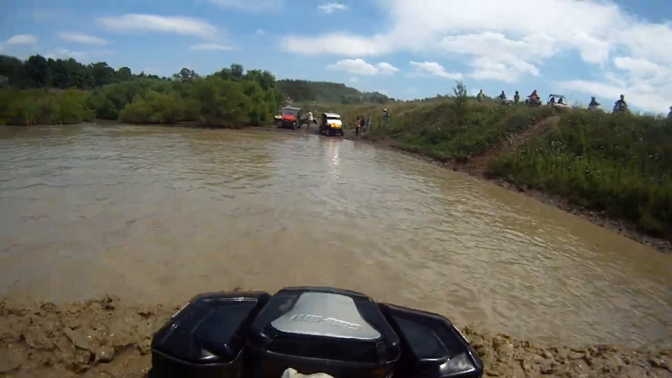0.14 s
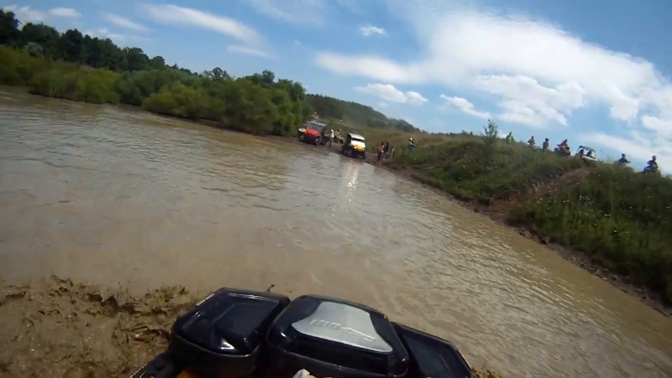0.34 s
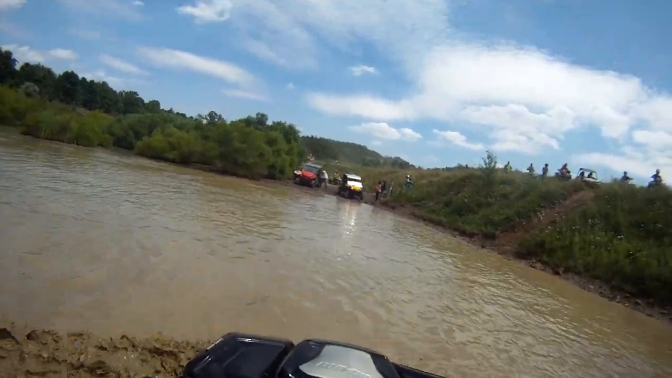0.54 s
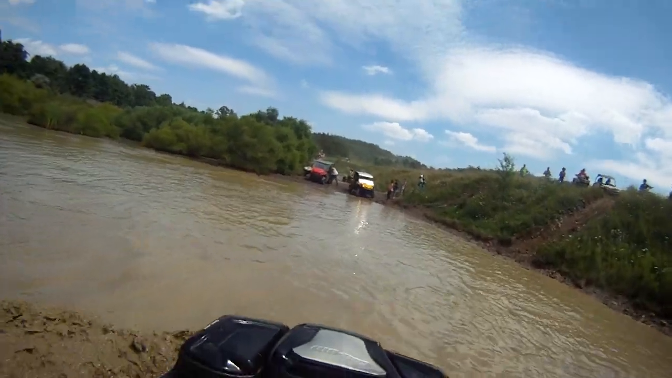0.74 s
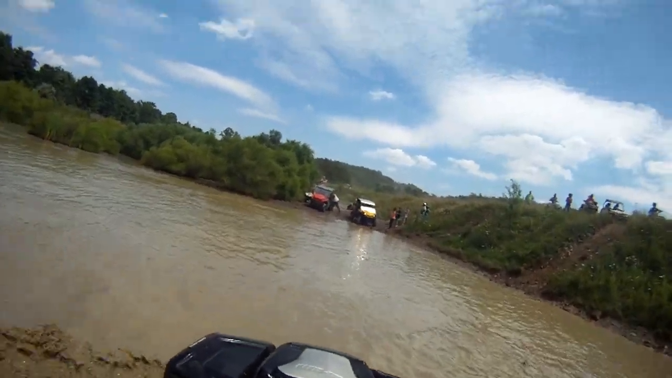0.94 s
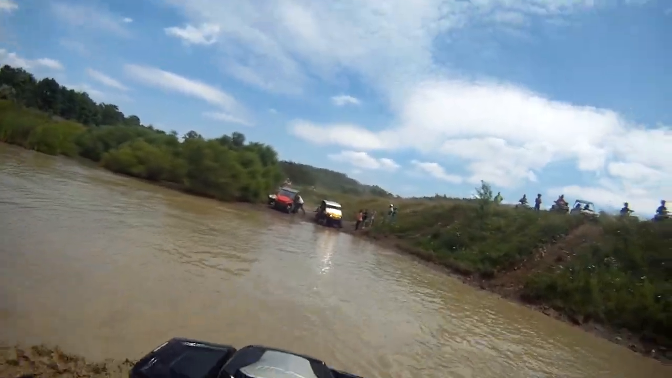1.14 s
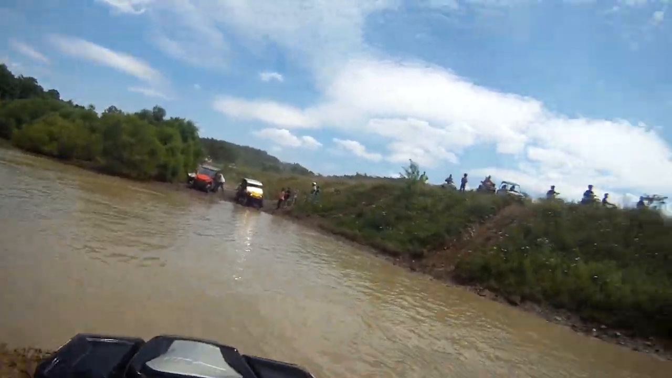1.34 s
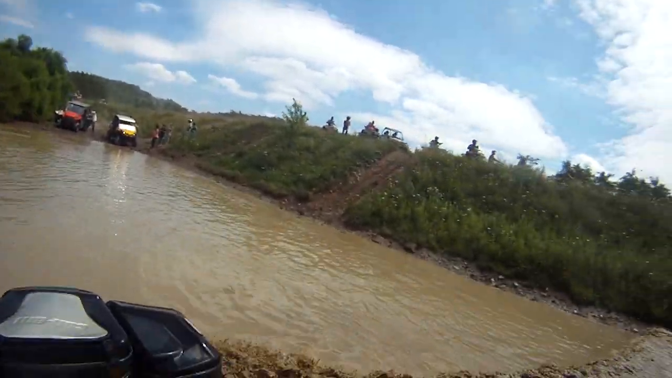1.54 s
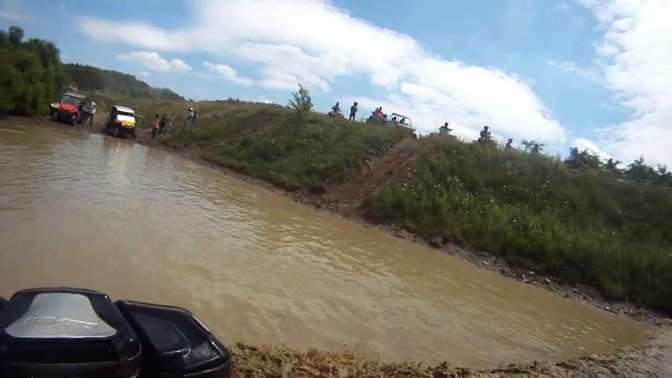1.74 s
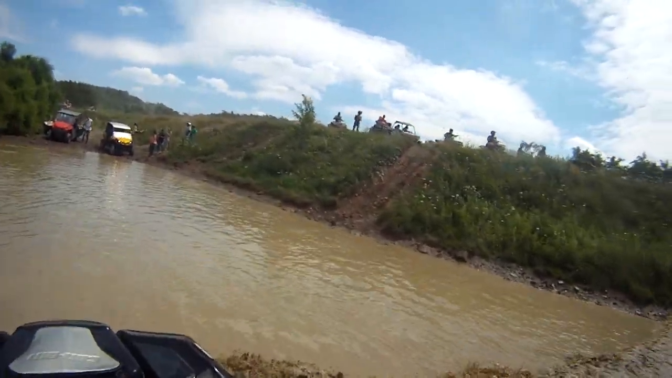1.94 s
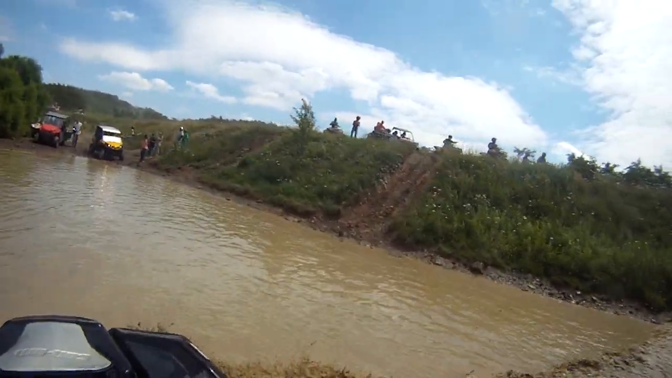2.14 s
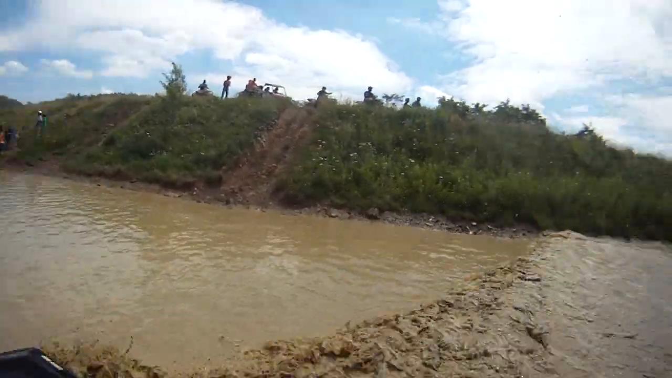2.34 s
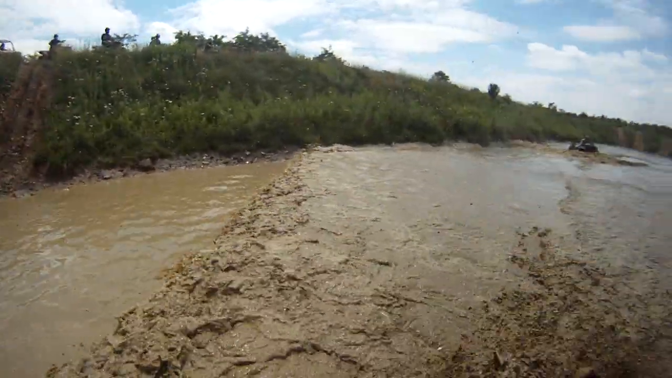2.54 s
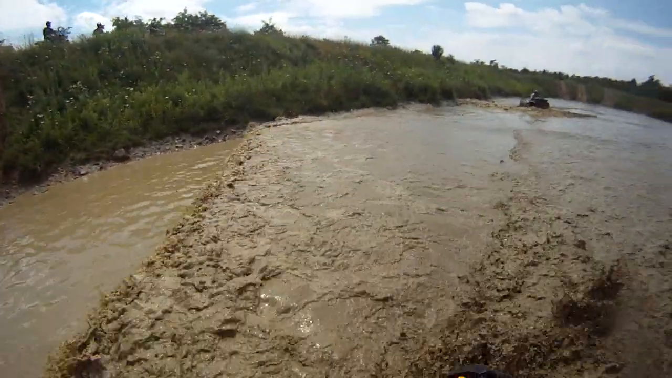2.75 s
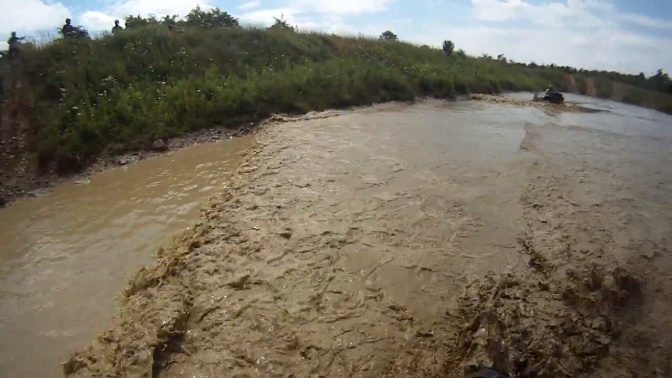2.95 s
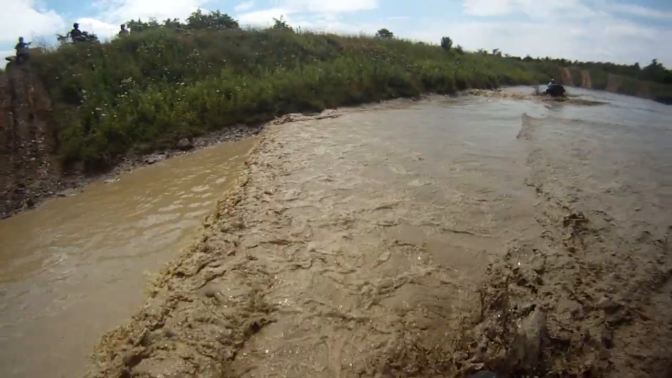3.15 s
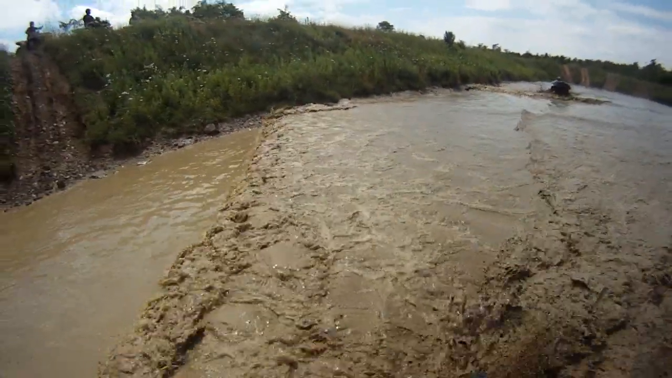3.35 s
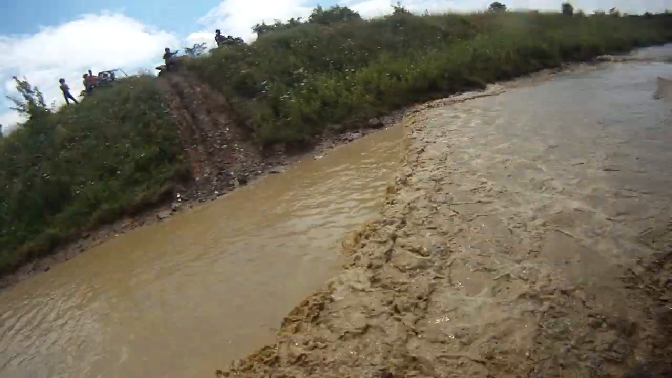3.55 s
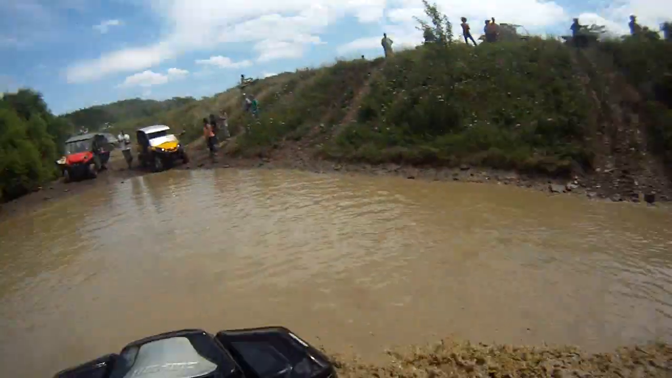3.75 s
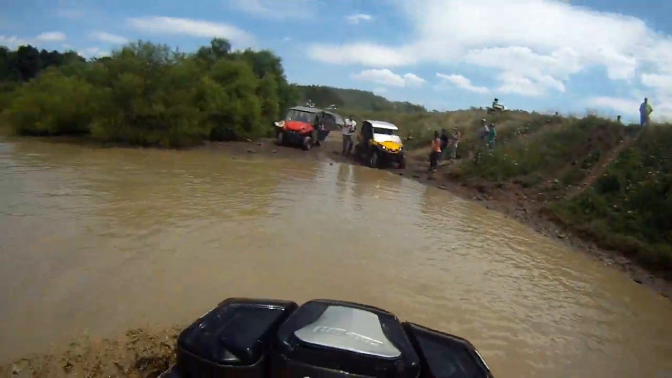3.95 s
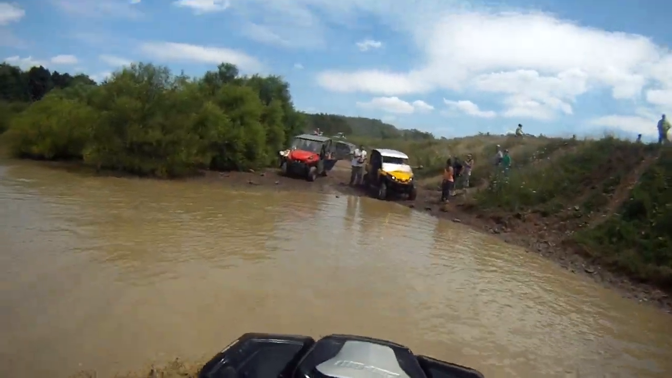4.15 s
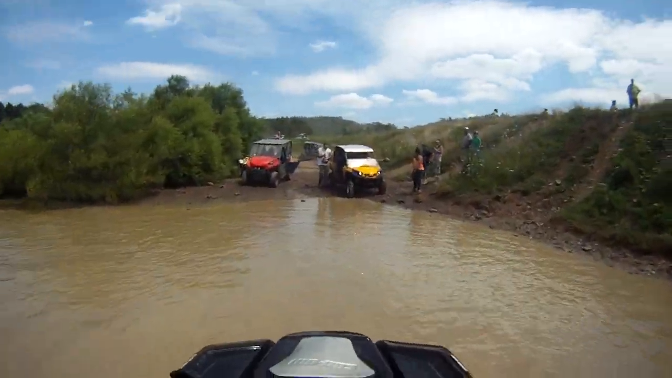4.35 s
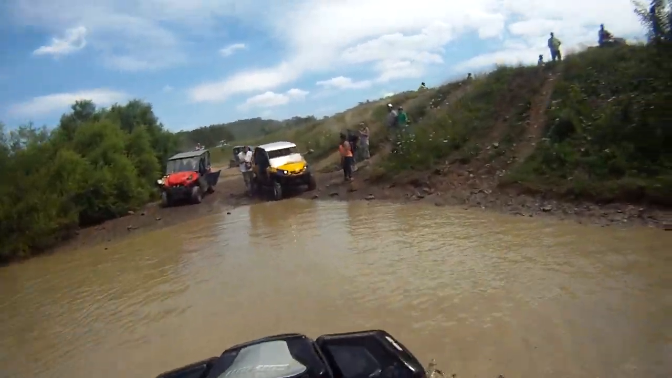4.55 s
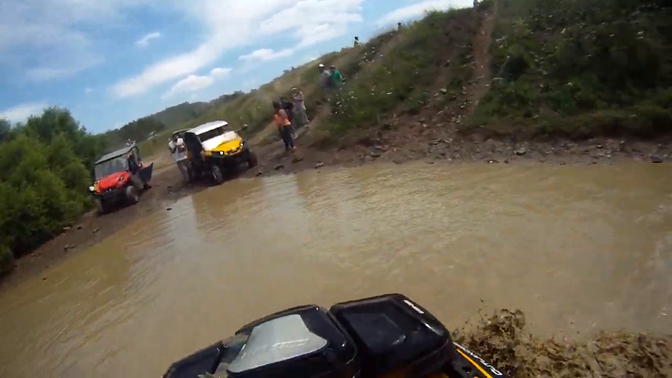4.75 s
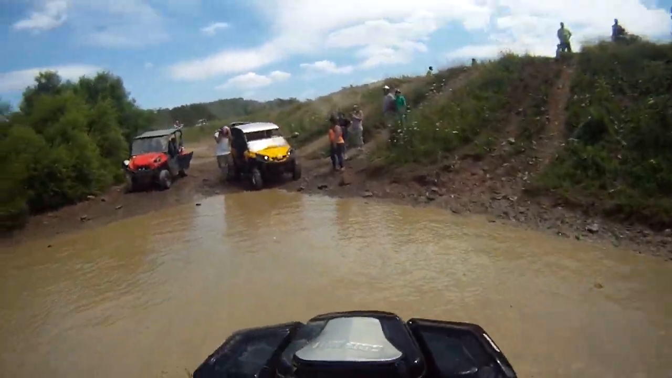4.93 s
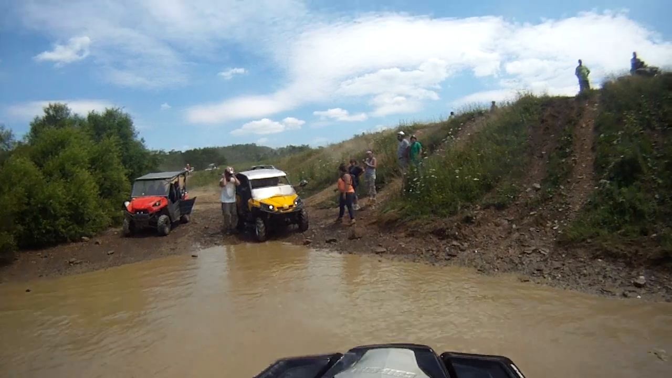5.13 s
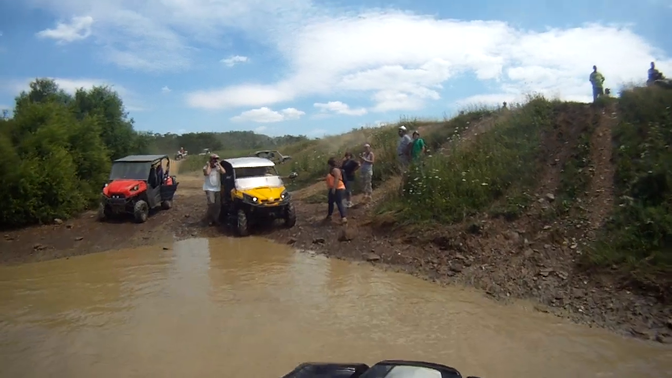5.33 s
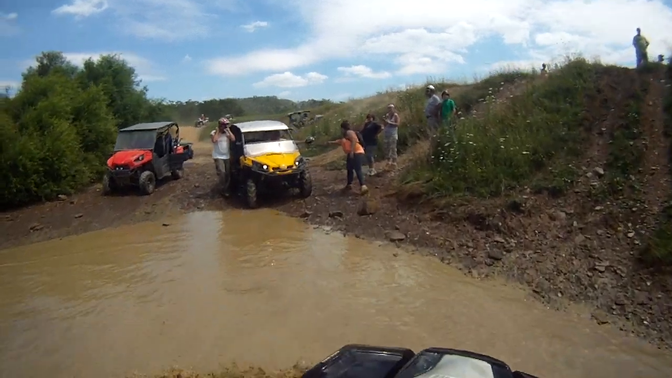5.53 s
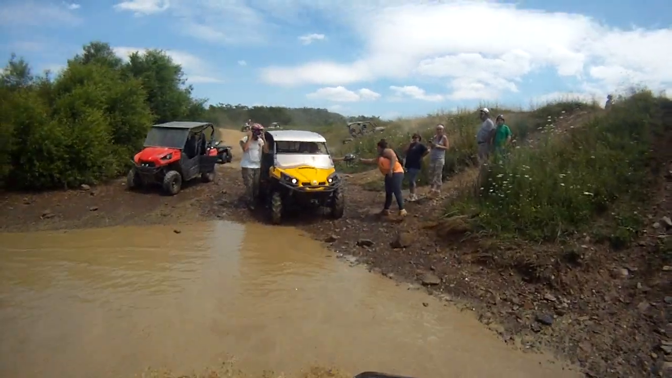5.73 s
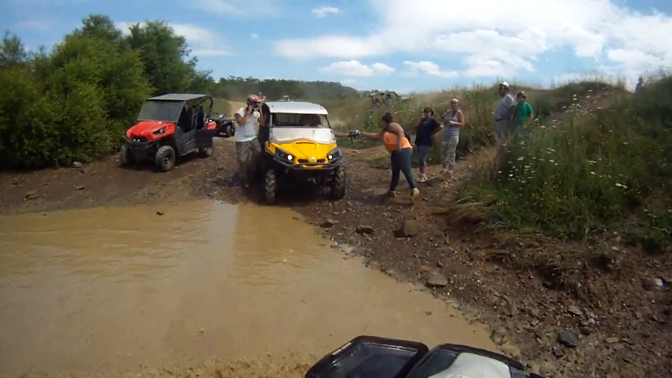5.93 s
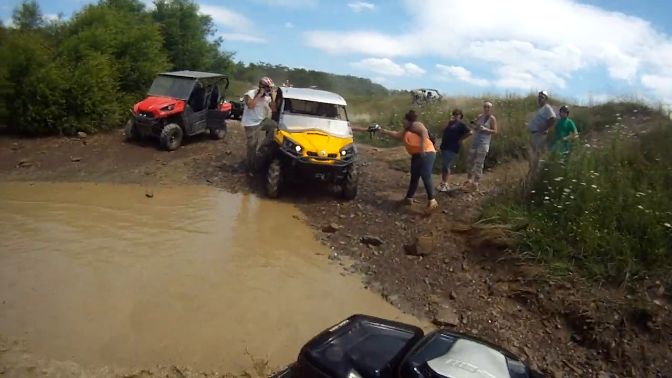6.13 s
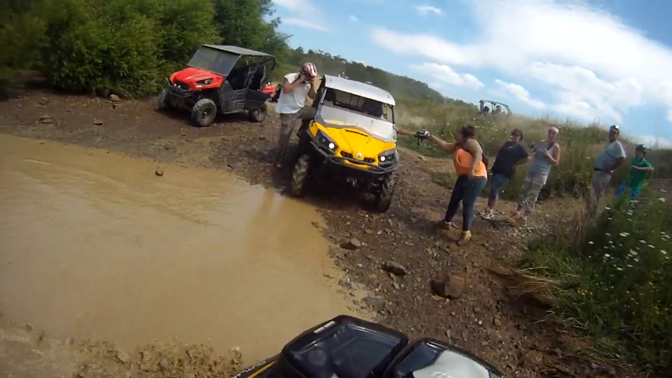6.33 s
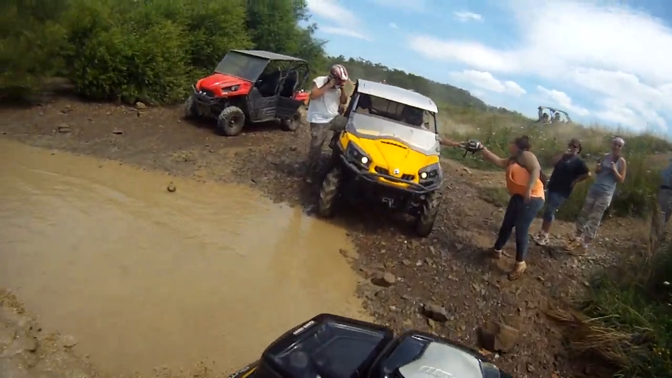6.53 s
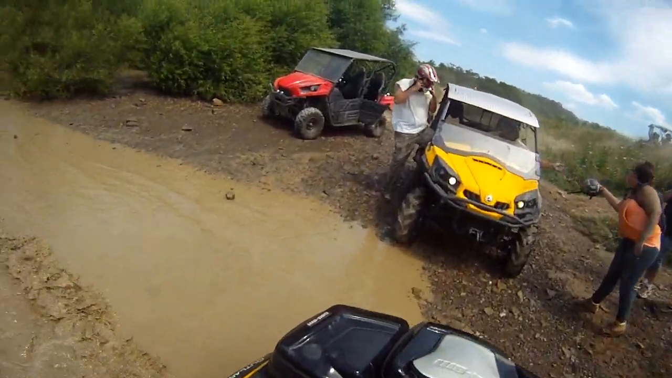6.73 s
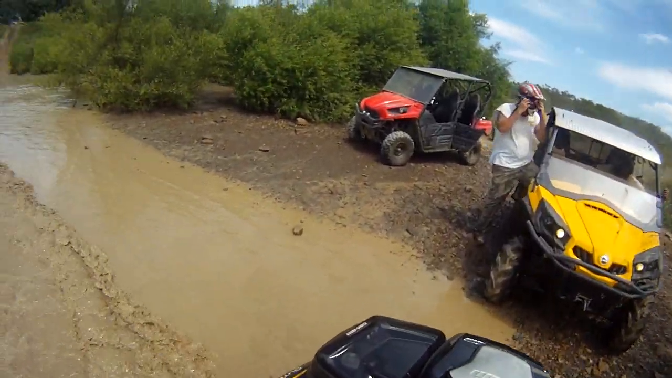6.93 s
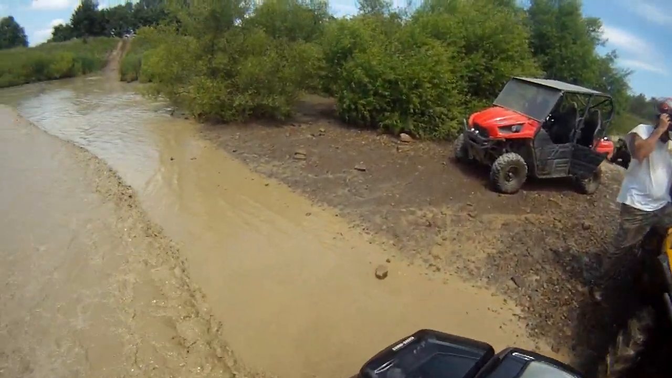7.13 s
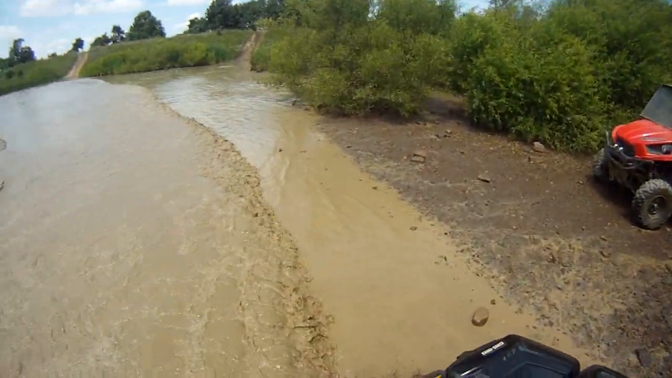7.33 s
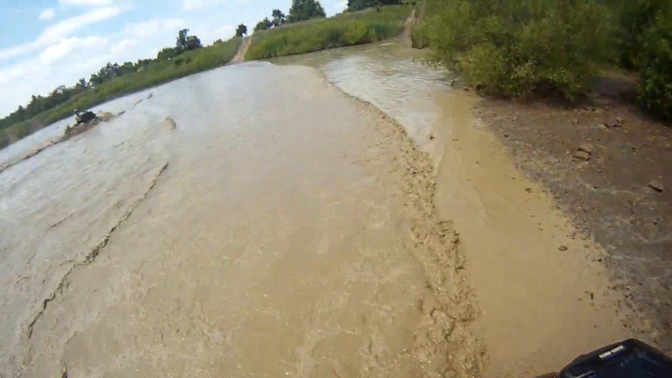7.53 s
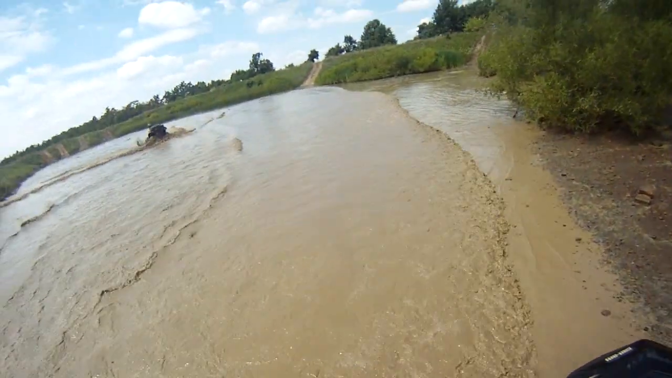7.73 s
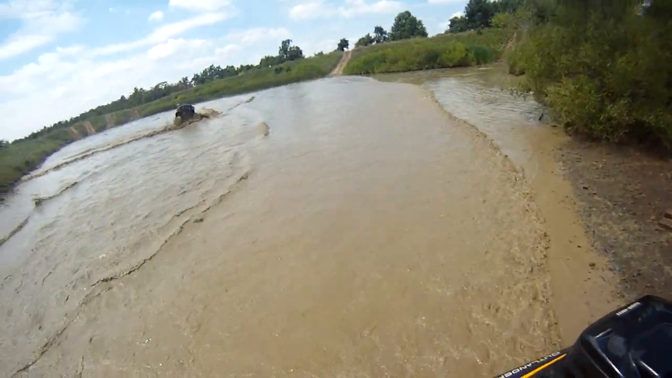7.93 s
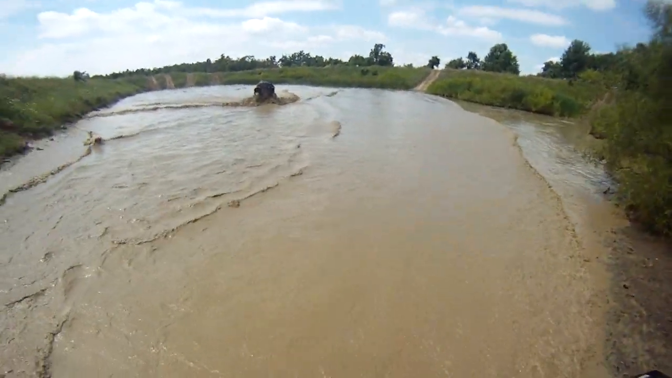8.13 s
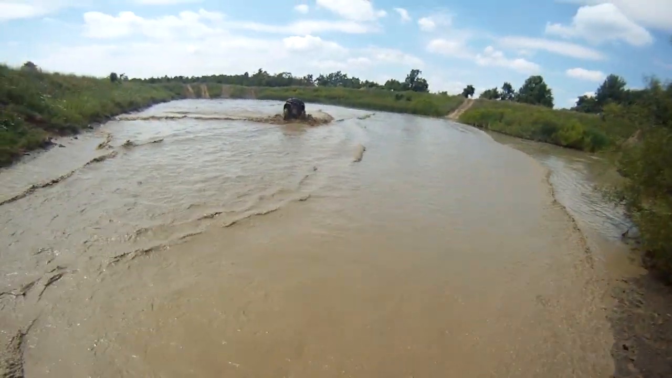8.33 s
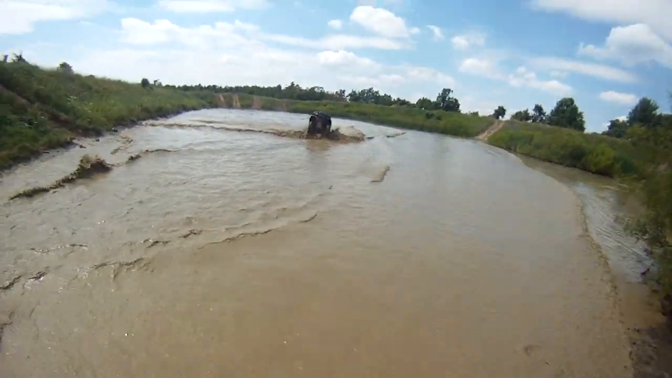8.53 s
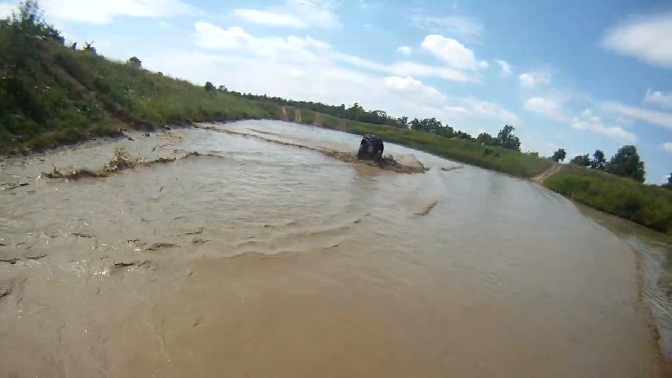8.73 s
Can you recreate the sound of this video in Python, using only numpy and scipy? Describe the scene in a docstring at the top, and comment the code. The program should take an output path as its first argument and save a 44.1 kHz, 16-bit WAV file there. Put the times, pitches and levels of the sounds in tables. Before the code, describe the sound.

Heard from a helmet microphone in the open, a quad wades through a muddy pond with a loud, slightly wavering engine drone, rattling covers and whirring belt drive. Water sloshes and sprays more strongly midway, with a short surge. The throttle then eases, the engine quietens and slows to lumpy thuds, then revives a little. A faint distant quad hums near the end under light wind; the sound has a thin glassy fizz.

```python
"""A muddy pond: a V-twin quad wades under throttle, eases off near the bank, chugs almost at idle and pulls away.
Close by, engine-order harmonics boom, noise growls in the air box, and taps and cogs clatter in their covers.
Around them bubbles and filtered noise make the churned water and mud; another quad drones far out on the pond.
The microphone is on the rider's helmet in light wind; its camera holds coarse samples, a thin glassy fizz."""
import sys
import numpy as np
from scipy.fft import rfft, irfft, next_fast_len
from scipy.io import wavfile
from scipy.ndimage import uniform_filter1d, map_coordinates

SR = 44100
rng = np.random.default_rng(int(sys.argv[2]) if len(sys.argv) > 2 else 0)


def wrap_up_sound(samples):
    """Save the sound to the file named by the first command line argument, as 16-bit audio."""
    columns = np.atleast_2d(samples).T
    # keep every value between -1 and 1, then stretch to whole-number steps
    tamed = np.clip(columns, -1, 1)
    steps = np.round(tamed * 32767).astype(np.int16)
    wavfile.write(sys.argv[1], SR, steps)


N = 387189  # length in samples

# Engine speed, before a slight wander: t/s, rate/four-stroke cycles per second
ENGINE_SPEED = [(0.0, 45.9), (0.26, 45.2), (0.54, 47.0), (0.75, 45.6), (0.89, 47.1), (1.06, 43.4),
                (1.31, 45.8), (1.82, 47.9), (1.95, 49.7), (2.19, 45.5), (2.51, 45.4), (2.71, 46.9),
                (3.49, 47.1), (3.65, 50.0), (3.95, 44.5), (4.34, 47.4), (4.82, 44.2), (5.01, 45.0),
                (5.23, 41.2), (5.36, 37.8), (5.52, 30.3), (5.65, 28.4), (6.2, 27.9), (6.48, 29.3),
                (7.16, 24.9), (7.33, 21.0), (7.58, 17.2), (7.86, 23.7), (8.14, 24.6), (8.36, 27.5),
                (8.56, 27.6), (8.78, 20.8)]
# How hard the engine works: t/s, exhaust gain/dB
THROTTLE_GAIN = [(0, -31.5), (1.1, -31.5), (1.85, -30.5), (2.3, -32), (2.6, -31), (3.45, -30.7), (3.9, -33),
                 (4.3, -31), (4.75, -35), (5.15, -32.5), (5.5, -41), (6.4, -41.5), (7.1, -44.5),
                 (7.55, -48.5), (8, -37.3), (8.3, -40), (8.6, -42), (8.78, -49)]
# Riding and where the helmet points: t/s, load/0-1, head turned back towards the tailpipe/0-1
RIDE_AND_HEAD = [(0, 1, 0), (2.35, 1, 0), (2.6, 1, 1), (3.65, 1, 1), (3.85, 1, 0), (5.25, 1, 0),
                 (5.5, 0, 0), (7.15, 0, 0), (7.5, 0, 1), (8.78, 0, 1)]
# Blend from the coasting tone to the pulling-away tone as the engine sinks to near idle: t/s, share/0-1
PULLING_SHARE = [(7.2, 0.02), (7.6, 0.74)]
# What the exhaust passes of each engine order with the throttle open: f/Hz, gain/dB
OPEN_THROTTLE_TONE = [(38, -8), (47, -4.5), (84, -5), (95, -2.5), (121, -1), (140, -5.5), (165, -12),
                      (188, -13.5), (232, -20), (290, -21.5), (330, -28.5), (365, -15), (435, -14.5),
                      (475, -26), (600, -21), (740, -35), (890, -29), (1000, -41)]
# Extra growl when the microphone faces the tailpipe: f/Hz, gain/dB
TAILPIPE_TONE = [(90, 1), (140, 1), (230, -1), (300, 3.5), (430, 3), (600, -2.5), (900, 11.5)]
# The exhaust with the throttle nearly shut: f/Hz, gain/dB
COASTING_TONE = [(28, -14), (56, -8.5), (84, -3.5), (112, -4), (126, 2), (142, -2.5), (170, -26),
                 (198, -30), (226, -9.5), (265, -28), (312, -15.5), (360, -16.5), (430, -24), (600, -39)]
# The exhaust near idle and while pulling away: f/Hz, gain/dB
PULLING_TONE = [(25, -24), (50, -21), (75, -10), (97, -9), (108, -3), (122, 2), (138, -4), (165, -20),
                (200, -11.5), (222, -17), (260, -5.5), (320, -11), (400, -25), (560, -32)]
# One order of the note swells or dips for a moment: t/s, half length/s, order, lift/dB
ORDER_SWELLS = [(.25, 0.22, 3, 2.5), (.58, .1, 4, 7), (1.557, 0.38, 5, 9), (2.9, 0.33, 10, 7),
                (3.62, 0.14, 6, 14), (6.35, .25, 12, 5.5), (6.9, 0.22, 3, 5), (7.7, 0.1, 6, 13),
                (7.8, 0.11, 5, 4.5), (8.62, .06, 3, 13), (8.66, .12, 5, -9)]
FIRING_GAP = 0.415  # between the two cylinders, in cycles
WAVER_DB = 2.5  # how far the higher orders drift in level, scaled down for those below 250 Hz
DULL_BELOW_RATE, DULL_DB_PER_RATE, DULL_ABOVE_ORDER = 28.4, 1.0, 6.5  # cycles/s, dB per cycle/s, order


def exhaust(turns):
    """The main note: harmonics of the cycle from two unevenly firing cylinders slide through the pipe's resonances."""
    speed, = curves(ENGINE_SPEED)
    effort_db, = curves(THROTTLE_GAIN)
    pulling, = curves(PULLING_SHARE)
    loaded, back = curves(RIDE_AND_HEAD)
    tones = [(OPEN_THROTTLE_TONE, loaded), (TAILPIPE_TONE, loaded * back),
             (COASTING_TONE, (1 - loaded) * (1 - pulling)), (PULLING_TONE, pulling)]
    knots = np.arange(0, turns[-1], 7)  # the drift changes every 7 cycles

    def partial(k):
        """Order k: the two cylinders add or cancel, and the pipe sets its level."""
        # the second cylinder is the duller one
        cylinders = 1 + np.exp(-k / 9 - 2j * np.pi * k * FIRING_GAP)
        # phases grow looser with order, so the upper growl does not chirp
        smear = 1 - 0.715 * k + rng.normal(0, 0.12 * k)
        db = sum(share * along(tone, k * speed) for tone, share in tones)
        # near idle the upper orders fade
        if k > DULL_ABOVE_ORDER:
            db = db - DULL_DB_PER_RATE * np.maximum(DULL_BELOW_RATE - speed, 0)
        for s, half_s, order, lift_db in ORDER_SWELLS:
            if round(order) == k:
                db = db + lift_db * swell(s, half_s)
        wave = np.cos(2 * np.pi * k * turns + np.angle(cylinders) + smear)
        return amp(db) * np.sqrt(2) * np.abs(cylinders) * wave

    def drift(k):
        """Each higher order drifts in level at random."""
        wander = np.interp(turns, knots, rng.standard_normal(len(knots)))
        return wander * np.minimum(k * speed / 250, 1) ** 2

    boom = sum(partial(k) for k in range(1, 4))
    growl = sum(amp(WAVER_DB * drift(k)) * partial(k) for k in range(4, 21))
    return amp(effort_db) * (boom * amp(0.19 * wobble(28)) + growl * amp(0.73 * wobble(40)))


# Exhaust pipe and silencer, as thuds pass through them: f/Hz, gain/dB
PIPE_TONE = [(15, -48), (30, 0), (48, 2.5), (70, -1.5), (93, 4.5), (120, 4), (142, -1.5), (170, -11.5),
             (230, -15), (300, -38.5), (700, -60), (2000, -110)]
# Hard firings near idle: t/s, nominal level/dB
HARD_FIRINGS = [(7.237, -33), (7.399, -32), (7.47, -30), (7.581, -26), (7.647, -27), (7.697, -28),
                (7.746, -23), (8.609, -36), (8.656, -29)]
# at cruise/dB, per doubling of speed/dB, per dB of throttle/dB
FLUTTER_DB, FLUTTER_DB_PER_OCTAVE, FLUTTER_FOLLOWS = -41.5, 4, 0.3


def flutter(turns):
    """No two firings are alike: what each has above or below the regular firing thuds in the pipe."""
    flutter_db = driven(FLUTTER_DB, FLUTTER_DB_PER_OCTAVE, FLUTTER_FOLLOWS)
    varied = twin(turns, gap=FIRING_GAP, second_db=-1, jitter_s=0.0003, scatter_db=2)
    regular = twin(turns, gap=FIRING_GAP, second_db=-1, jitter_s=0, scatter_db=0)
    kicks = np.zeros(N)
    for s, db in HARD_FIRINGS:
        # 4 ms early, and raised because the pipe spreads out a one-sample kick
        kicks[round((s - 0.004) * SR)] = -amp(db + 41.5)
    return amp(flutter_db) * even(body(varied - regular, PIPE_TONE)) + body(kicks, PIPE_TONE)


# Air box resonances: f/Hz, width/Hz, gain/dB
AIRBOX_MODES = [(237.4, 22, 2), (311, 25, -5), (402, 117, -6.5), (612, 110, -4.5), (900, 60, -11)]
# at cruise/dB, per doubling of speed/dB, per dB of throttle/dB
INTAKE_DB, INTAKE_DB_PER_OCTAVE, INTAKE_FOLLOWS = -46, 3.5, 0.5


def intake(turns):
    """Turbulent gulps of air, one per cycle, rasp in the resonances of the air box."""
    intake_db = driven(INTAKE_DB, INTAKE_DB_PER_OCTAVE, INTAKE_FOLLOWS)
    gulps = noise() * amp(1.9 * np.cos(2 * np.pi * (turns - 0.2)))
    tone = [(60, -28.5), (150, 11.0), (220, 0), (900, -5), (1500, -12), (5000, -38)]
    rasp = body(resonate(gulps, AIRBOX_MODES), tone)
    return amp(intake_db) * even(rasp)


# Valve and cover clatter, before a small wobble: t/s, level/dB
CLATTER_LEVEL = [(0, -35.5), (.6, -32.5), (2.2, -33.5), (3, -33.5), (5.15, -33.5), (5.45, -39.5),
                 (6.9, -44), (7.7, -45.5), (7.95, -42.5), (8.5, -41.5), (8.78, -45.5)]
# Ring of the cylinder heads and covers: f/Hz, gain/dB
HEAD_TONE = [(300, -38.5), (780, -18), (950, -14), (1100, -0.5), (1270, 2.5), (1400, -9), (1800, -13.5),
             (3000, -29), (6000, -55)]


def valves(turns):
    """Valves and cam chain tap in step with the shaft and loose parts rattle; the ring sounds lower from behind."""
    loaded, back = curves(RIDE_AND_HEAD)
    valve_db = curves(CLATTER_LEVEL)[0] + 0.65 * wobble(22)
    taps = twin(turns + 0.0997, gap=0.36, second_db=-5, jitter_s=0.00008, scatter_db=2.0)
    throb_db = 0.59 * np.cos(2 * np.pi * (turns - 0.25)) + 0.47 * np.cos(4 * np.pi * turns)
    chain = amp(-13.5 + 2.4 * loaded) * meshing(turns, count=90)
    rattle = unit((noise() + chain) * amp(throb_db + 0.68 * wobble(45)))
    ring = body(rattle + amp(-7.0) * unit(taps), HEAD_TONE)
    behind = body(ring, [(850, 5.5), (1120, 4), (1300, -3.0), (1600, 1)])
    return amp(valve_db) * even((1 - back) * ring + back * behind)


# Ring of the belt drive casing: f/Hz, gain/dB
CASING_TONE = [(500, -39), (1250, -15.5), (1420, -13.5), (1530, -2.5), (1760, -8.5), (2060, 1),
               (2180, -1.5), (2320, 1.5), (2500, -4), (2680, -15.5), (3080, -22), (3450, -15.5),
               (3850, -20), (5000, -38.5)]
# at cruise/dB, per doubling of speed/dB, per dB of throttle/dB
BELT_DB, BELT_DB_PER_OCTAVE, BELT_FOLLOWS = -35.5, 2, 0.28


def belt_drive(turns):
    """Belt cogs and gears rasp in their casing, throbbing with the power strokes."""
    belt_db = driven(BELT_DB, BELT_DB_PER_OCTAVE, BELT_FOLLOWS) + 0.68 * wobble(9)
    throb_db = np.cos(2 * np.pi * (turns - 0.25)) + 0.3 * np.cos(4 * np.pi * turns)
    cogs = amp(-16.0) * meshing(turns, count=160)
    rasp = (noise() + cogs) * amp(throb_db + 0.34 * wobble(70))
    return amp(belt_db) * even(body(rasp, CASING_TONE))


# Loose covers clank: t/s, strength/dB
COVER_CLANKS = [(1.756, -22), (1.865, -21.5), (2.1926, -20), (2.271, -22.5), (2.3508, -19), (2.4165, -21),
                (2.5543, -23), (3.272, -26)]


def clanks():
    """Now and then a loose cover strikes harder: two damped sines ring briefly."""
    out, t = np.zeros(N), np.arange(SR // 10) / SR
    ring = np.sin(2 * np.pi * 1250 * t) + 0.77 * np.sin(2 * np.pi * 1130 * t)
    # falls 60 dB in 51 ms after a soft onset
    ring = ring * amp(-60 * t / 0.051) * (1 - np.exp(-t / 0.00068))
    for s, db in COVER_CLANKS:
        out[round(s * SR):][:len(t)] += amp(db) * ring
    return out


# Churned water, before surge and wobble: t/s, slosh level/dB, spray level/dB
WATER_LEVELS = [(0, -58, -45.5), (1.4, -52, -45), (2.7, -46.5, -43.5), (3.4, -42.5, -43.5),
                (3.9, -43, -44.5), (5.15, -48.5, -45), (6.1, -56, -48.5), (7.5, -52, -51.5),
                (8.4, -55, -52), (8.78, -57, -52)]
# Colour of the sloshing mud: f/Hz, gain/dB
SLOSH_TONE = [(60, -19), (180, -7), (330, 3.5), (520, -2.5), (740, -7.5), (900, 7.5), (1300, 0.5),
              (3000, -78)]
# Colour of the spray: f/Hz, gain/dB
SPRAY_TONE = [(1000, -27), (2400, -19), (2650, -2.5), (2880, 3), (3060, -2.5), (3300, 0.5), (3800, -2),
              (4250, -12.5), (4700, -5), (5200, -1.5), (5500, -7), (5780, -7), (6000, -18.5)]
# The wheels slip and throw up a wave: t/s, half length/s, lifts/dB
SURGE_AT, SURGE_S, SURGE_SLOSH_DB, SURGE_SPRAY_DB = 3.62, 0.09, 6, 2


def water(turns):
    """The wheels churn up low bubbles in noise, and throw spray of small high drops in a hiss."""
    slosh_db, spray_db = curves(WATER_LEVELS)
    surge = swell(SURGE_AT, SURGE_S)
    churn = noise() + amp(-9.0) * bubbles(count=2200, centre_hz=604, spread=0.433, cycles=12.7, size_db=3)
    slosh = amp(slosh_db + SURGE_SLOSH_DB * surge + 1.5 * wobble(12)) * unit(body(churn, SLOSH_TONE))
    drops = bubbles(count=7000, centre_hz=4180, spread=0.19, cycles=2.8, size_db=4.0)
    mist = noise() * amp(0.16 * np.cos(2 * np.pi * (turns - 0.25)) + 0.34 * wobble(30))
    spray = unit(body(mist + amp(-11.5) * drops, SPRAY_TONE))
    return slosh + amp(spray_db + SURGE_SPRAY_DB * surge) * spray


# Mud splashes: t/s, relative level/dB
MUD_SPLASHES = [(1.353, -40), (2.571, -39), (2.630, -32), (3.602, -31.5), (5.244, -41), (7.061, -48)]


def splashes():
    """Now and then a lump of mud slaps down: a noise burst that falls 60 dB in 50 ms."""
    slaps, t = np.zeros(N), np.arange(SR // 10) / SR
    for s, db in MUD_SPLASHES:
        slaps[round(s * SR):][:len(t)] += amp(db - 1 - 60 * t / 0.05) * rng.standard_normal(len(t))
    return body(slaps, [(300, -20), (1500, -2), (4200, 1), (5300, 6), (6000, 1)])


# Another quad far out on the pond, before a slight waver: t/s, f/Hz, level/dB of each of two harmonics
FAR_QUAD_NOTE = [(7.0, 204.8, -76), (7.2, 211, -71), (7.35, 223, -52.5), (7.5, 230, -60), (7.68, 238, -56),
                 (7.8, 238.3, -63), (8.1, 240, -64), (8.38, 243.4, -52), (8.55, 240, -72)]


def far_quad():
    """A faint, mostly rising drone carries over the water: a wavering note and its octave."""
    hz, db = curves(FAR_QUAD_NOTE)
    phase = 2 * np.pi * np.cumsum(hz * (1 + 0.0041 * wobble(22))) / SR
    return amp(db + 1.5 * wobble(7.7)) * (np.sin(phase) + np.sin(2 * phase))


# Wind strength, before gusty wobbles: t/s, level/dB
WIND_GUSTS = [(0, -52), (2.3, -60), (3, -48), (3.6, -43), (4.2, -39), (5.3, -45), (6, -48), (7.5, -46),
              (8.78, -44)]
# Colour of the wind on the microphone: f/Hz, gain/dB
BUFFET_TONE = [(8, -16), (28, -4), (42, -20), (62, 1), (110, -7.5), (200, -9.5), (600, -37.5), (3000, -92)]


def wind():
    """Light buffeting on the microphone: low filtered noise that swells at random."""
    buffet_db, = curves(WIND_GUSTS)
    gust_db = buffet_db + 0.6 * wobble(2) + 1.3 * wobble(7.5)
    return amp(gust_db) * unit(body(noise(), BUFFET_TONE))


CRUISE_RATE, CRUISE_DB = 46, -31.5  # cycles/s and exhaust gain/dB while wading steadily


def driven(cruise_db, db_per_octave, follows):
    """Level in dB of an engine part that grows louder with speed and throttle."""
    speed, = curves(ENGINE_SPEED)
    effort_db, = curves(THROTTLE_GAIN)
    return cruise_db + db_per_octave * np.log2(speed / CRUISE_RATE) + follows * (effort_db - CRUISE_DB)


def strokes(turns, offset, jitter_s, scatter_db):
    """One impulse per engine cycle, offset cycles in, each a little off in time and size."""
    marks = np.arange(int(turns[-1]) - 1) + offset % 1
    chance = rng.standard_normal((len(marks), 2))
    at = np.interp(marks, turns, np.arange(N)) + jitter_s * SR * chance[:, 0]
    at = np.clip(at, 0, N - 2)
    i = at.astype(int)
    size = amp(np.broadcast_to(scatter_db, N)[i] * chance[:, 1])
    # share each impulse between its two neighbouring samples
    return np.bincount(i, size * (1 - at + i), N) + np.bincount(i + 1, size * (at - i), N)


def twin(turns, gap, second_db, jitter_s, scatter_db):
    """The two cylinders of the V act unevenly, gap cycles apart."""
    first = strokes(turns, 0, jitter_s, scatter_db)
    return first + amp(second_db) * strokes(turns, gap, jitter_s, scatter_db)


def meshing(turns, count):
    """Many small contacts at fixed shaft angles: a pattern that comes round again every cycle."""
    lines = np.zeros(1025, complex)
    lines[1:count + 1] = np.exp(2j * np.pi * rng.random(count))
    pattern = irfft(lines)
    return unit(np.interp(turns % 1, np.linspace(0, 1, len(pattern)), pattern))


def bubbles(count, centre_hz, spread, cycles, size_db):
    """Damped rising sines at random times; a few are much larger than the rest."""
    chance = rng.random((count, 2))
    hz = centre_hz * np.exp(spread * rng.standard_normal((count, 1)))
    hz = np.clip(hz, 150, HOLD_HZ / 2)
    n = np.arange(int(np.clip(2 * cycles * SR / centre_hz, 16, 1500)))
    age = hz * n / SR / cycles  # a bubble has lost 40 dB at age 1
    ring = np.sin(2 * np.pi * cycles * age * (1 + 0.13 * age)) * amp(-40 * age)
    size = amp(-size_db * np.log(np.maximum(chance[:, 1:], 0.01)))
    at = (chance[:, :1] * N).astype(int) + n
    return unit(np.bincount(at.ravel(), (size * ring).ravel(), N)[:N])


def amp(db):
    """Decibels to gain."""
    return 10 ** (np.asarray(db) / 20)


def unit(x):
    """Scale to rms 1."""
    return x / np.sqrt(np.mean(x ** 2) + 1e-20)


def even(x):
    """Hold the rms near 1 all along, over about a fifth of a second."""
    power = uniform_filter1d(uniform_filter1d(x ** 2, size=SR // 6), size=SR // 8)
    return x / np.sqrt(np.abs(power) + 1e-20)


def curves(rows):
    """One value per sample for each column after the time."""
    s, *cols = np.transpose(rows)
    return [np.interp(np.arange(N) / SR, s, c) for c in cols]


def along(points, hz):
    """(f/Hz, value) points read on a log axis."""
    f, v = np.transpose(points)
    return np.interp(np.log(hz), np.log(f), v)


def swell(s, half_s):
    """A smooth hump of height 1 around time s."""
    return np.exp(-((np.arange(N) / SR - s) / half_s) ** 2)


def wobble(rate):
    """A smooth random curve, rate knots a second."""
    knots = rng.standard_normal(int(N * rate / SR) + 4)
    return map_coordinates(knots, [np.arange(N) * rate / SR])


def noise():
    """White noise of rms 1."""
    return rng.standard_normal(N)


def filtered(x, response):
    """x times a complex response of frequency."""
    m = 2 * next_fast_len((N + SR // 2) // 2)
    return irfft(rfft(x, m) * response(np.fft.rfftfreq(m, 1 / SR)), m)[:N]


def body(x, points):
    """x through a causal, minimum-phase filter given as (f/Hz, gain/dB) points."""
    f, db = np.transpose(points)

    def response(hz):
        gain = amp(np.interp(np.log(hz + 1), np.log(f), db))
        cepstrum = irfft(np.log(gain))
        half = len(cepstrum) // 2
        # folding the cepstrum forward makes the filter causal
        cepstrum[1:half] *= 2
        cepstrum[half + 1:] = 0
        return np.exp(rfft(cepstrum))
    return filtered(x, response)


def resonate(x, modes):
    """x through parallel (f/Hz, width/Hz, gain/dB) resonances of alternating sign."""
    def response(f):
        total = 0
        for k, (centre, width, db) in enumerate(modes):
            damping = 1j * f * width
            total = total + (-1) ** k * amp(db) * damping / (centre * centre - f * f + damping)
        return total
    return filtered(x, response)


def scene():
    """One shaft drives every engine sound; water, mud, a far quad and wind surround it."""
    speed, = curves(ENGINE_SPEED)
    turns = np.cumsum(speed * (1 + 0.001493 * wobble(14))) / SR  # engine cycles so far
    engine = exhaust(turns) + flutter(turns) + intake(turns) + valves(turns) + belt_drive(turns)
    return (engine + clanks() + water(turns) + splashes() + far_quad() + wind())[None]


HOLD_HZ, TOP_HZ = 12000, 15320  # rate of the held samples, upper limit of the sound


def record(dry):
    """The helmet camera holds each sample for a while, which mirrors the sound faintly around the holding rate."""
    narrow = filtered(dry[0], lambda hz: hz < HOLD_HZ / 2)
    mirrored = narrow * (1 + 2 * np.cos(2 * np.pi * HOLD_HZ * np.arange(N) / SR))

    def held(hz):
        return np.sinc(hz / HOLD_HZ) / np.sinc(hz / SR) * (hz < TOP_HZ)
    return filtered(mirrored, held)[None]


dry = scene()
out = record(dry)
wrap_up_sound(out)
```